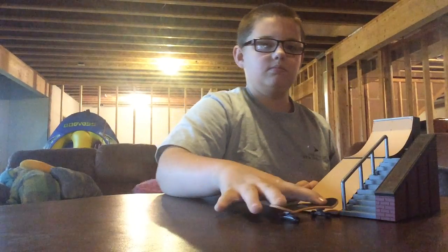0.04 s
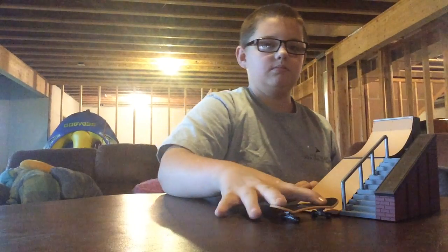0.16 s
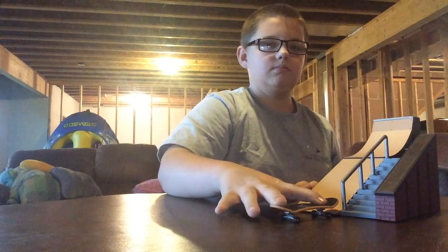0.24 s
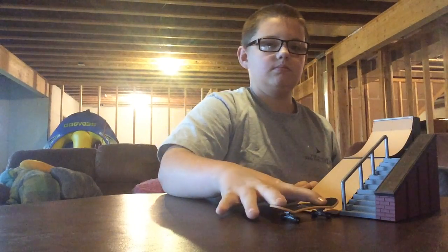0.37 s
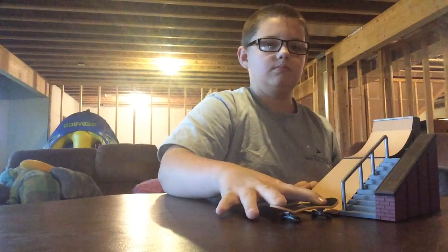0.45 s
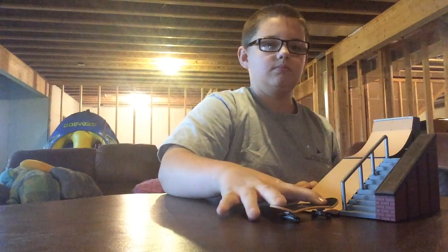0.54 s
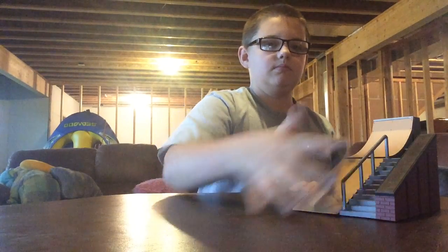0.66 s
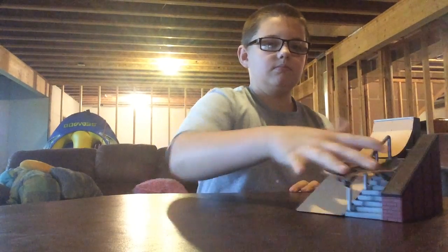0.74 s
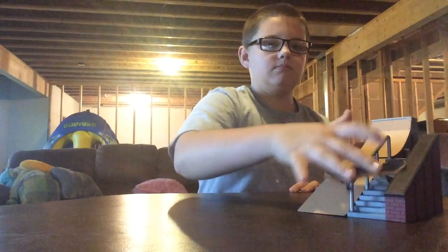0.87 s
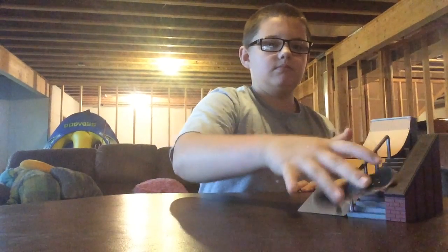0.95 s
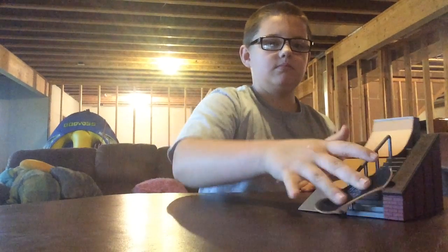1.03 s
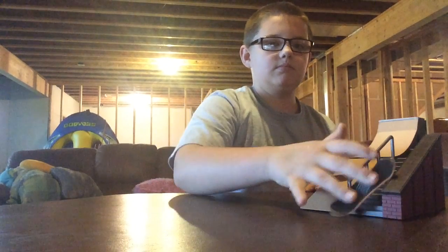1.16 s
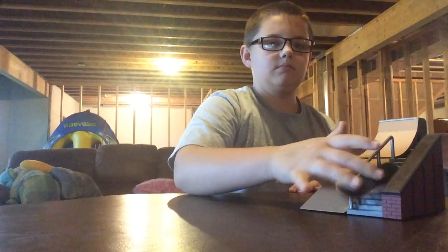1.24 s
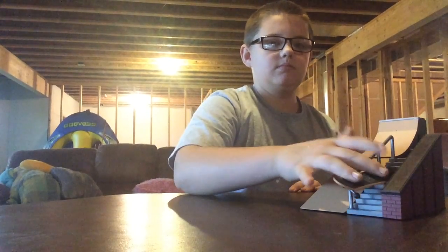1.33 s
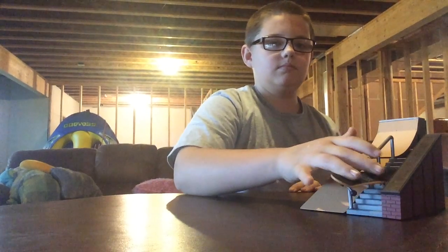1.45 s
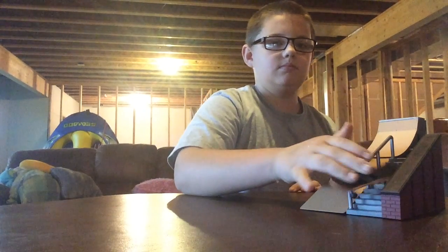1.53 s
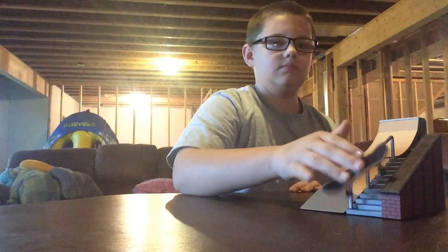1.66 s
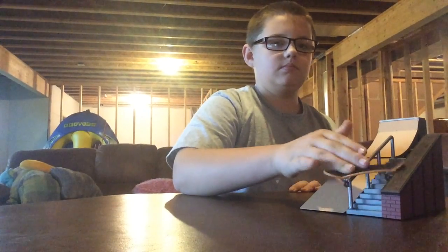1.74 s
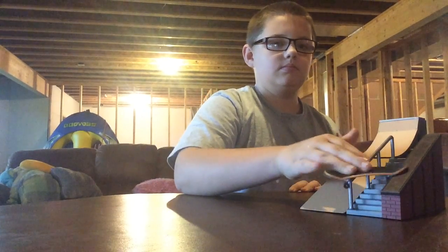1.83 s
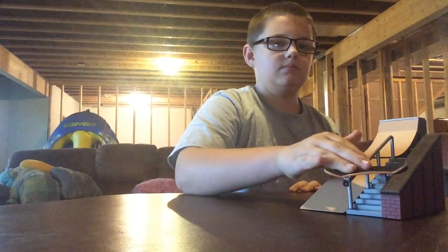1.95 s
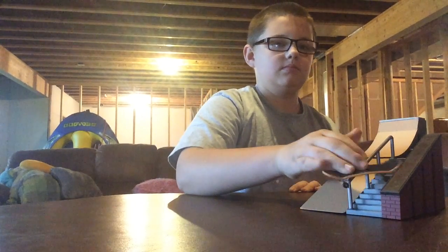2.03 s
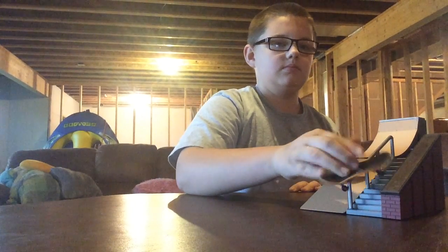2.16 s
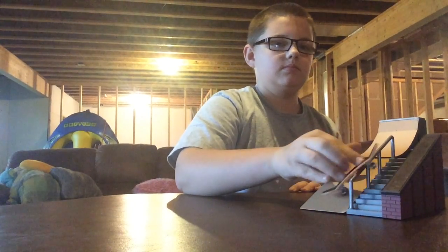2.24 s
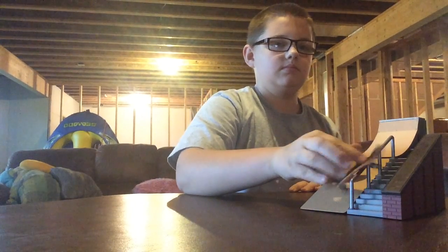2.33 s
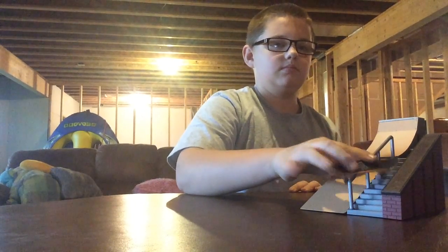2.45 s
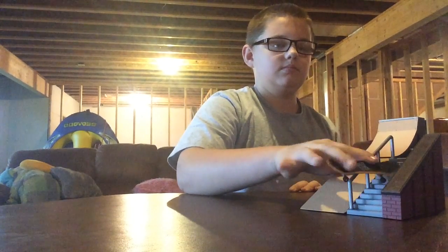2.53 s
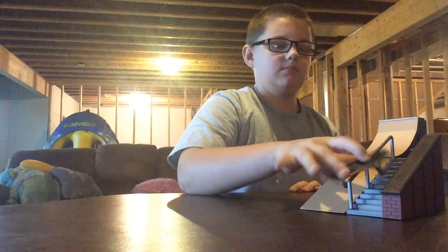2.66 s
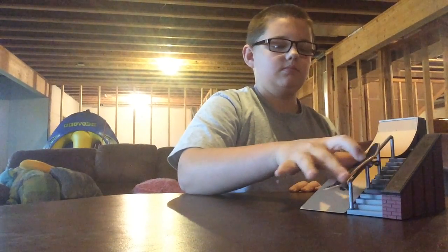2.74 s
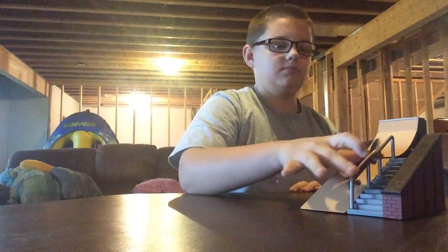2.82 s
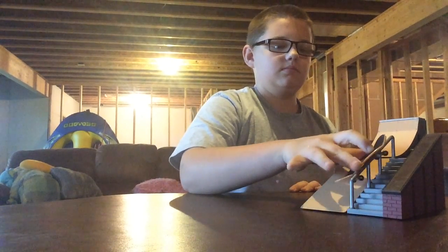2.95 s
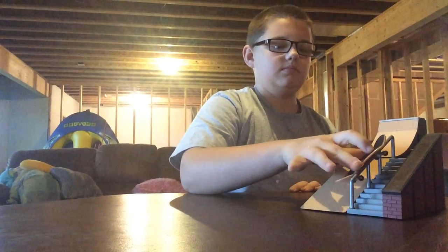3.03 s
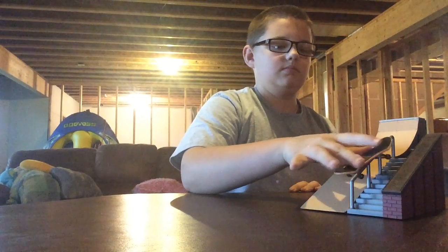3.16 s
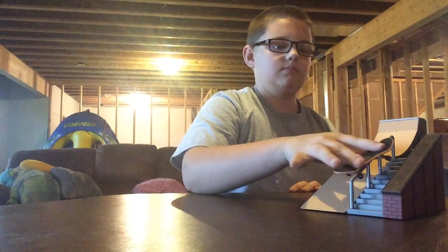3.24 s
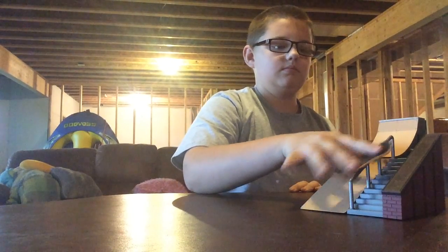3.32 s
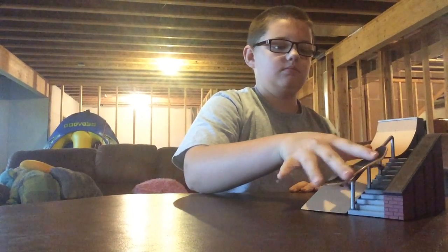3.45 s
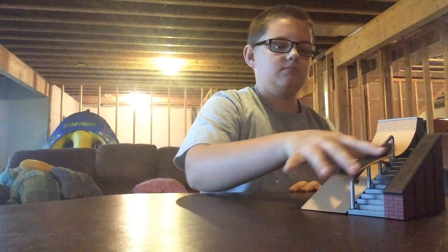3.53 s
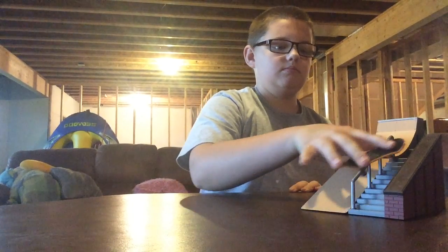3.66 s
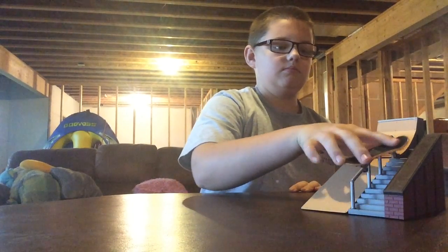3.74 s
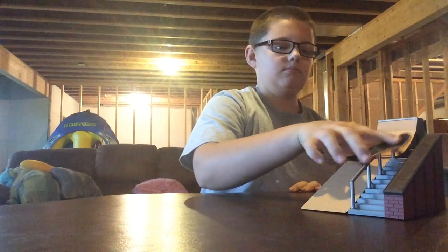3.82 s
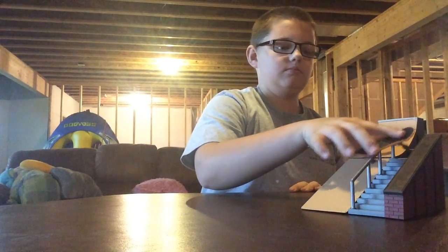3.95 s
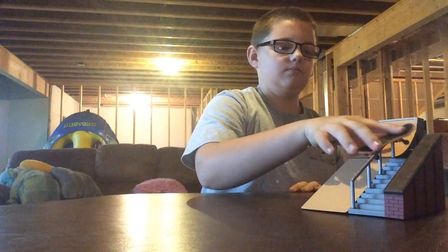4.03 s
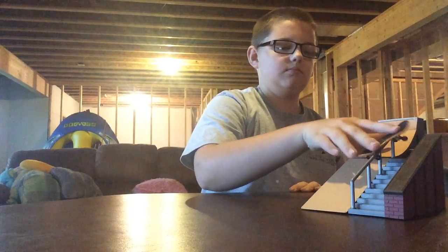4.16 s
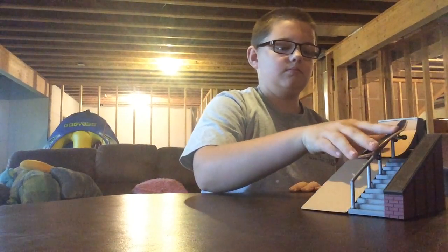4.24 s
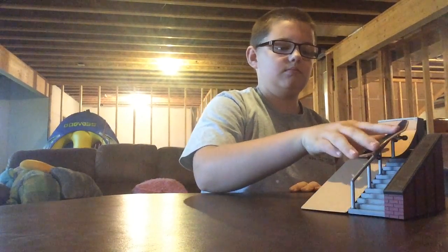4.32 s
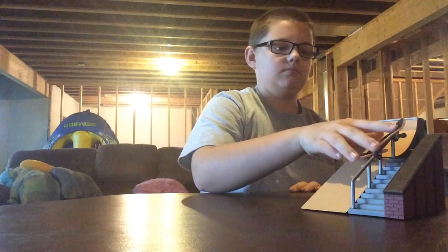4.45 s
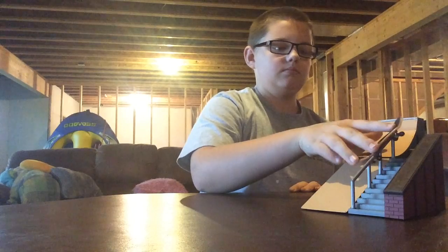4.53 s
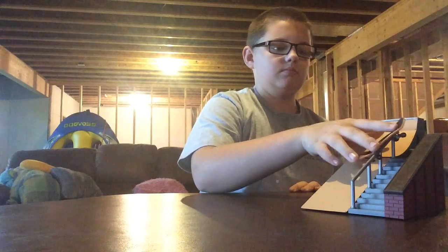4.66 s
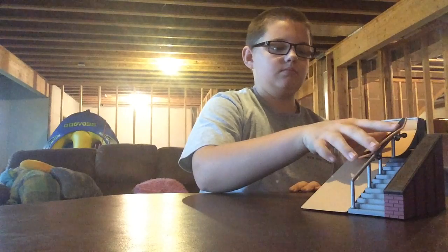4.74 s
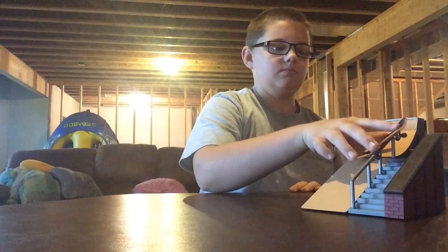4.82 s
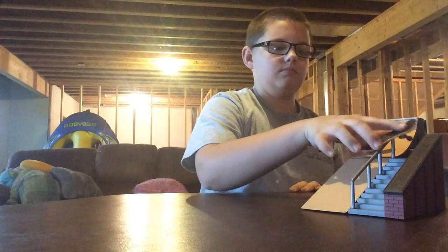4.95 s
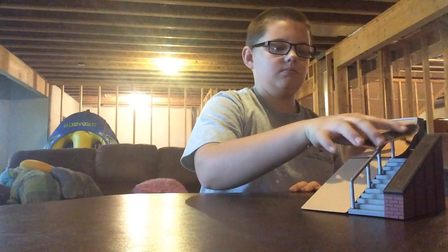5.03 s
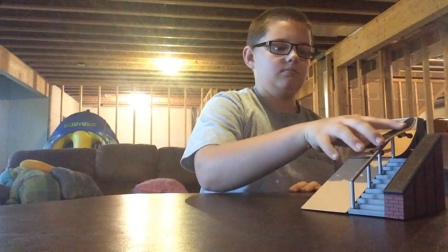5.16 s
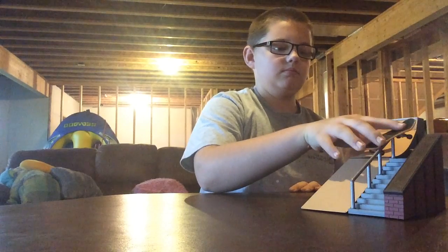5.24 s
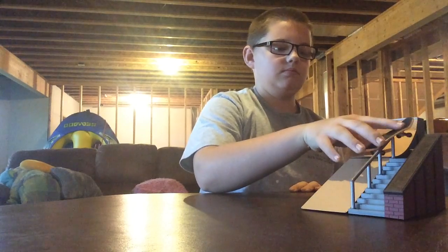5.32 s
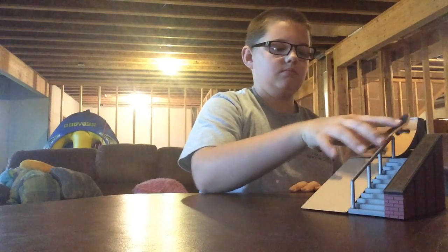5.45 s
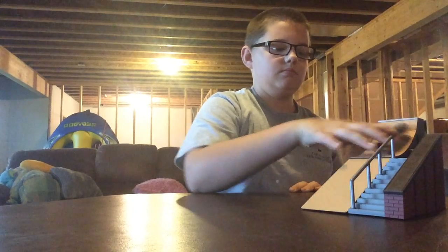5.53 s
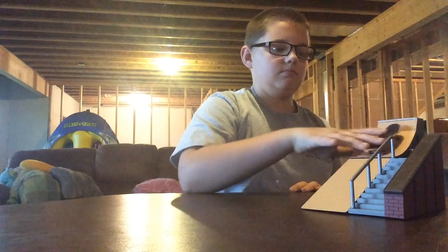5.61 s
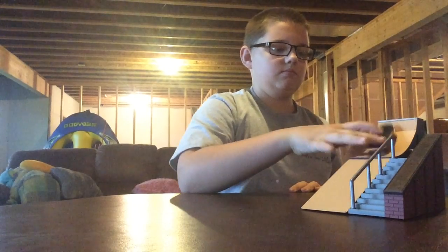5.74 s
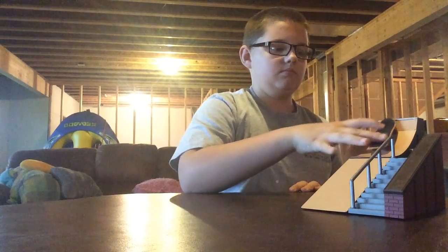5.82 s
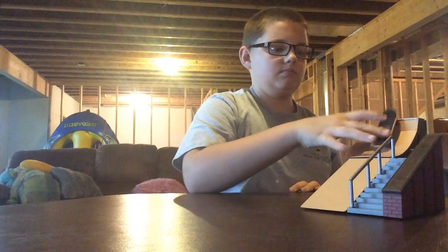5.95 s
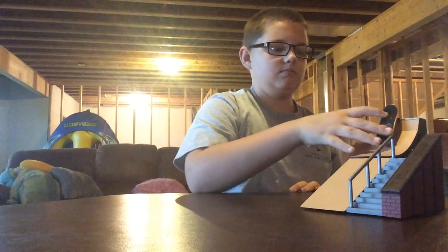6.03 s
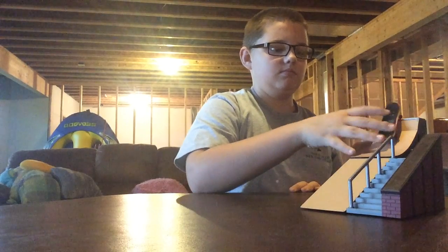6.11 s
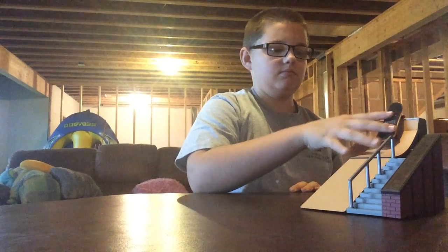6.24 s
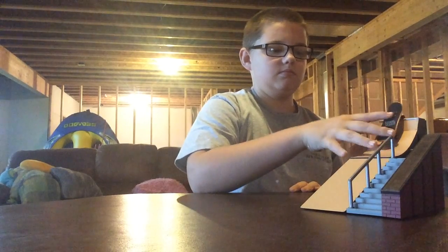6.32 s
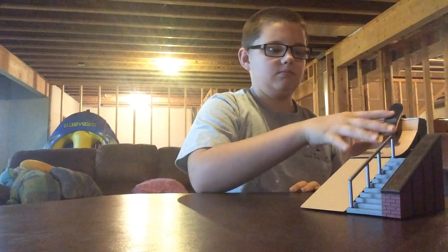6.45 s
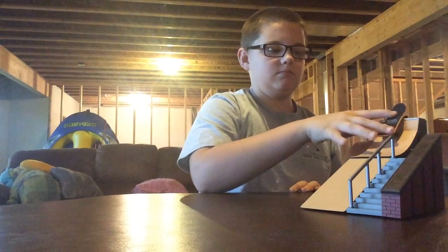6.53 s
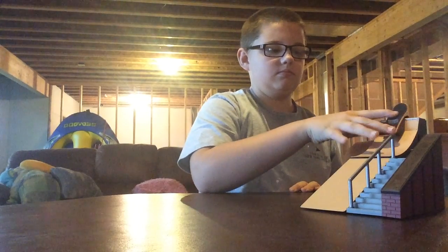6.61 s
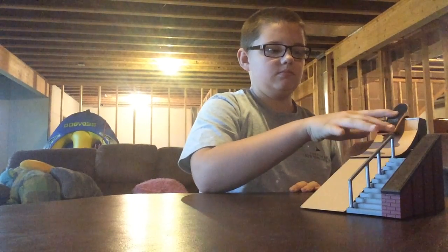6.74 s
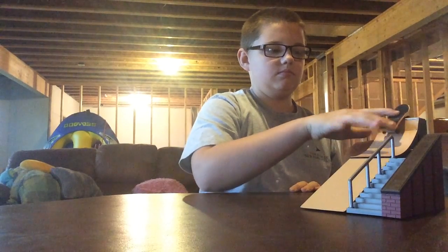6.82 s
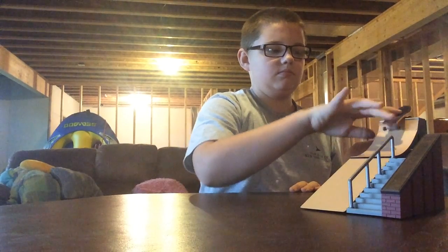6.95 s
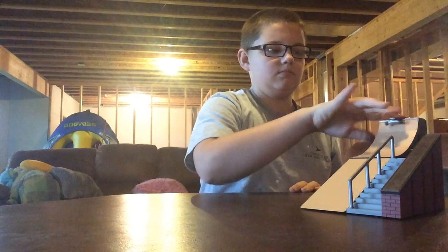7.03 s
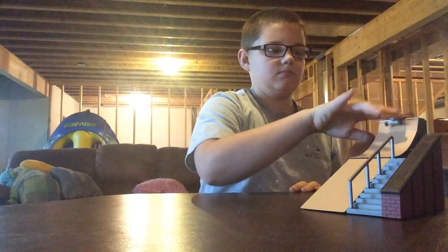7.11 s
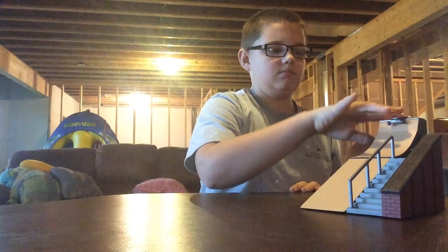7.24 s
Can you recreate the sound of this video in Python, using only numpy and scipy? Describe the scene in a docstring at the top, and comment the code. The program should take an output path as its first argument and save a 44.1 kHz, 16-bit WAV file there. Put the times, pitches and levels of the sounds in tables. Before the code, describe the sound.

Scattered clacks and brief scrapes of a tiny toy skateboard on a handrail and hollow plastic ramp, in a quietly humming basement.

```python
"""Over the low, steady hum of a house, a fingerboard is popped off a wooden table. It clacks and grinds
along a small handrail, and a few scattered clacks follow. At 5.6 s it lands on a hollow plastic ramp
and rocks there, its wheels rasping briefly; at 7.1 s it is let go and the deck rings freely.
All along, each knock rings the deck, its metal trucks, the ramp panel and the table top,
and the basement answers with a short tail."""
import sys
import numpy as np
from scipy import signal
from scipy.fft import rfft, irfft
from scipy.io import wavfile

SR = 44100
rng = np.random.default_rng(int(sys.argv[2]) if len(sys.argv) > 2 else 0)


def wrap_up_sound(samples):
    """Save the sound to the file named by the first command line argument, as 16-bit audio."""
    columns = np.atleast_2d(samples).T
    # keep every value between -1 and 1, then stretch to whole-number steps
    tamed = np.clip(columns, -1, 1)
    steps = np.round(tamed * 32767).astype(np.int16)
    wavfile.write(sys.argv[1], SR, steps)


N = 321036
KNOCK_T = np.arange(int(.5 * SR)) / SR   # time axis of one knock [s]
ATTACK = int(.012 * SR)   # the opening samples that set a knock's level


# the board's tail hits the table: (time [s], thump level [dB], thump centre [Hz])
POP_HITS = [(0.73, -20.5, 260), (1.104, -27, 186), (3.509, -35.5, 101)]

def pops(out):
    """A finger pops the tail down with a soft push: a round table thump under a small click."""
    for s, db, hz in POP_HITS:
        add(out, s, knock(db - 20, hardness_db=-2.1, table_db=db, panel_db=db - 15.5, chatter_s=0.0024,
                          table_hz=hz, table_lift_db=9.5, truck_db=5.5, rise_s=0.0033))


# hits on rail and steps: (time [s], level [dB], hardness [dB], hand's weight into the table [dB])
CLACK_HITS = [(0.782, -33, -1.5, -4), (0.807, -38.5, 7.5, -13), (0.827, -37, 3, -8),
              (0.868, -38.5, 2.5, 4.5), (1.002, -53, -7, 9), (1.016, -54, -0.5, 6), (1.19, -45.5, 4, -25),
              (1.246, -57.5, -4.5, 14.5), (1.281, -47, 1.5, 2), (1.362, -30, 1.2, -6.5),
              (1.461, -49, -7.5, -5), (1.54, -62, -7.5, 6), (1.671, -42, -2.5, -13), (1.685, -45.5, -8, -4),
              (1.785, -58.5, -1.5, 2), (1.821, -46, -2.5, 4.5), (1.896, -54.5, 5.5, 6),
              (1.947, -39.5, 1, -10), (2.103, -55.5, -1.5, 2), (2.195, -41.5, -2, -3.5),
              (2.22, -52, 4.5, -20), (2.314, -62, -2, 8), (2.389, -55.5, -2.5, 10),
              (2.499, -49.5, -2.5, -2), (2.526, -56, -4.5, 4), (2.589, -54.5, -3, 7),
              (2.799, -50, -2, -0.5), (2.916, -52, -8.5, -3), (3.039, -49, 3.5, 7), (3.391, -72, -19, 14),
              (3.493, -44.5, 3.5, 6), (3.735, -65, 1.5, -1), (3.831, -60, 1.5, 12), (4.122, -52, 1.5, 4.5),
              (4.807, -65, 2.5, -7), (5.026, -56, 4, 11.5), (5.097, -67, 10, 11.5)]
SOFT_CHATTER = 0.42   # dB of extra chatter time per dB of softness

def clacks(out):
    """The board clacks on rail and steps; softer contacts chatter longer."""
    for s, db, hardness_db, weight_db in CLACK_HITS:
        chatter_s = 0.0027 * from_db(-SOFT_CHATTER * hardness_db)
        add(out, s, knock(db, hardness_db, table_db=db + weight_db, panel_db=db + 1,
                          chatter_s=chatter_s, truck_db=-5, rail_db=-6))


# touchdowns on the ramp: (time [s], level [dB], hardness [dB], panel boom over level [dB], chatter [s])
LANDING_HITS = [(0.815, -27.5, -5, 4, 0.0012), (5.6, -33.5, -2, 11, 0.002), (5.609, -32.5, 0.5, -2, 0.0041),
                (5.622, -23, 1, -5, 0.0032), (5.628, -25.5, -2, 12.5, 0.0081),
                (7.105, -41, -5.5, 18, 0.012), (7.124, -36.5, -2, 17, .0085), (7.147, -28, -3.5, 3, 0.0033),
                (7.22, -28.5, -0.5, 9.5, 0.0045)]
LET_GO_S = 7.1   # from here on no finger touches the deck

def landings(out):
    """The hollow ramp booms; all four wheels load the deck, so it rings lower."""
    for s, db, hardness_db, boom_db, chatter_s in LANDING_HITS:
        add(out, s, knock(db, hardness_db, table_db=db - 3.5, panel_db=db + boom_db,
                          chatter_s=chatter_s, pitch_ratio=0.706, free=s > LET_GO_S))


# rocking on the ramp: (time [s], level [dB], hardness [dB], roll before [s], roll after [s])
BUMP_HITS = [(5.847, -47, -6.5, 0.035, 0.12), (5.974, -44.5, -0.5, 0.027, 0.035),
             (6.1, -46, -3, 0.061, 0.012), (6.231, -45.5, 3.5, .04, 0.037), (6.347, -47, -2, 0.0056, 0.031),
             (6.553, -54, 5, 0.062, 0.014), (6.64, -47.5, 4, 0.0087, 0.005)]

def bumps(out):
    """The wheels tick over the ramp's plastic joints, which ring higher than rail and steps."""
    for s, db, hardness_db, _, _ in BUMP_HITS:
        chatter_s = 0.0064 * from_db(-SOFT_CHATTER * hardness_db)
        add(out, s, knock(db, hardness_db, table_db=-47, panel_db=-33.5,
                          chatter_s=chatter_s, pitch_ratio=1.19))


# a harder contact rings brighter: (hardness [dB], favoured pitch [Hz])
HARDNESS_PITCH = [(-14, 980), (-6, 1150), (-2, 1820), (3.5, 2880), (3, 3300), (7.5, 4100)]
# modes of the deck with no finger on it: (pitch [Hz], level [dB], t60 [s])
FREE_DECK_MODES = [(845, -9, .08), (1240, -7, .06), (1958, 2, .085), (4220, -17, .1), (4600, -19, .1)]

def knock(db, hardness_db, table_db, panel_db, chatter_s, table_hz=389, table_lift_db=4.5, truck_db=-7,
          rise_s=0.00035, pitch_ratio=1, rail_db=None, free=False):
    """One hit: chatter sounds in the board, the push behind it rings ramp and table, the room answers."""
    deck_db, snap_db = db - hardness_db, db + hardness_db   # hardness tips wood towards fittings and trucks
    deck_hz = pitch_ratio * np.interp(hardness_db, *np.transpose(HARDNESS_PITCH))
    push = signal.unit_impulse(len(KNOCK_T))
    force = contact(chatter_s, chatter_db=14.5, rattle_s=0.005, rattle_db=8.5, rattles_per_s=1300)
    body = from_db(panel_db - 0.5) * ramp_panel(push)
    body += from_db(table_db) * table_top(push, table_hz, table_lift_db)
    if free:   # no finger damps the deck: more ring, less crack
        body += from_db(deck_db - 1.5) * rms_one(ring(push, FREE_DECK_MODES), ATTACK)
        deck_db -= 3.5
    levels = deck_db, snap_db, snap_db + truck_db
    direct = swell(rise_s) * board(favour(force, deck_hz, lift_db=9, q=7.7), *levels)
    if rail_db is not None:
        direct += from_db(snap_db + rail_db) * handrail(push)
    # over all directions the chatter's ripple evens out, so the room gets the plain touch
    room_send = board(favour(push, deck_hz, lift_db=4.5, q=2.2), *levels)
    return direct + body + basement(room_send + body)


def contact(chatter_s, chatter_db, rattle_s, rattle_db, rattles_per_s):
    """One hard touch, a quickly dying chatter, then a few tiny bounces of the loose wheels."""
    chatter, bounces = rng.standard_normal((2, len(KNOCK_T)))
    chatter *= swell(0.36 * chatter_s) * np.exp(-KNOCK_T / chatter_s)
    bounces *= (rng.random(len(KNOCK_T)) < rattles_per_s / SR) * np.exp(-KNOCK_T / rattle_s)
    return (signal.unit_impulse(len(KNOCK_T)) + from_db(chatter_db) * chatter / np.linalg.norm(chatter)
            + from_db(rattle_db) * bounces / np.linalg.norm(bounces))


# modes of the held board's three parts: (pitch [Hz], level [dB], t60 [s])
DECK_MODES = [(870, 0, .055), (1110, -4, .035), (1240, -1, .04), (1460, 0, .04), (1600, -2, .03),
              (1720, -3, .025), (1955, 1, .04), (2330, 1, .025)]
FITTING_MODES = [(2520, 0, .025), (2920, 1, .025), (3220, 1, .03), (3600, -2, .015), (3950, -1, .015),
                 (4280, 0, .02), (4830, -3, .012), (5950, -1, .02)]
TRUCK_MODES = [(8630, -1, .012), (9640, 0, .018), (10150, 0, .018), (11500, -1, .015), (12600, -3, .012)]

def board(force, deck_db, snap_db, truck_db):
    """Three layers: the wooden deck's knock, the plastic fittings' snap, the metal trucks' bright tick."""
    deck = from_db(deck_db) * gripped_part(force, DECK_MODES, 620, 2220, ring_db=0)
    snap = from_db(snap_db) * gripped_part(force, FITTING_MODES, 2460, 6530, ring_db=-1.5)
    trucks = from_db(truck_db) * gripped_part(force, TRUCK_MODES, 7600, 15700, ring_db=-12)
    return deck - snap + trucks


def gripped_part(force, modes, low_hz, high_hz, ring_db):
    """A small part under the fingers: a dry crack, and a short ring that the grip detunes."""
    detuned = [(hz * rng.normal(1, .01), db, t60) for hz, db, t60 in modes]
    crack = rms_one(band(force, low_hz, high_hz), ATTACK)
    ringing = rms_one(band(ring(force, detuned), low_hz, high_hz), ATTACK)
    return rms_one(crack + from_db(ring_db) * ringing, ATTACK)


# modes of the plastic ramp: (pitch [Hz], level [dB], t60 [s])
PANEL_MODES = [(401, -12, 0.032), (464.3, -5, 0.1), (517.7, 6, 0.054), (558.5, -0.5, 0.067),
               (636.5, -5.5, 0.084), (691.5, -9.5, 0.074)]

def ramp_panel(push):
    """The hollow ramp's panel answers a push with a boxy boom."""
    boom = swell(0.0023) * ring(push, PANEL_MODES)
    return rms_one(band(boom, 390, 870), ATTACK)


# modes of the wooden table's top and of its frame: (pitch [Hz], level [dB], t60 [s])
TOP_MODES = [(97, -9, 0.3), (124.7, -0.5, 0.098), (164.8, -1, 0.095), (209.9, -2, 0.09),
             (223.3, -12, 0.098), (260.8, 1.5, 0.062), (326.8, 7, 0.033)]
FRAME_MODES = [(42.6, 0, 0.81), (61.3, 0, 0.5)]

def table_top(push, centre_hz, lift_db):
    """The low end of a hit: the top thumps and the table shudders on its legs."""
    thump = swell(0.0036) * ring(favour(push, centre_hz, lift_db, q=2.1), TOP_MODES)
    shudder = swell(0.015) * ring(push, FRAME_MODES)
    return rms_one(band(thump, 37.2, 430), ATTACK) + from_db(-21.5) * rms_one(shudder, 4 * ATTACK)


# modes of the handrail: (pitch [Hz], level [dB], t60 [s])
RAIL_MODES = [(2880, -1.5, 0.023), (3236, -4, 0.13), (4425, 6.5, 0.026), (4890, 3, 0.017),
              (6100, 11.5, 0.024), (10600, -14, 0.13), (10930, 0, .06)]

def handrail(push):
    """The rail pings; where the board presses on it shifts its pitches and favours a few of them."""
    pressed = [(hz * rng.normal(1, .025), db, t60) for hz, db, t60 in RAIL_MODES]
    return rms_one(ring(push, pressed, scatter_db=5), ATTACK)


# strokes along the rail: (peak time [s], rise [s], fall [s], level [dB])
GRIND_STROKES = [(1.04, 0.042, 0.029, -47), (1.098, 0.0083, 0.019, -42.5), (1.29, 0.072, .05, -50.5),
                 (1.355, 0.038, 0.0093, -35.5), (1.673, 0.028, 0.031, -47.5), (1.78, 0.081, .07, -64),
                 (1.94, 0.075, .02, -57), (2.2, 0.11, 0.051, -65), (2.5, 0.11, 0.3, -62.5),
                 (2.82, 0.1, 0.13, -63)]

def grinds(rasp, drone, clinks_per_s=30):
    """The loose trucks scrape along the rail; each of their and the fittings' modes clinks at random."""
    clinks = rms_one(sum(ring(ticks(clinks_per_s), [mode]) for mode in FITTING_MODES + TRUCK_MODES))
    return strokes(GRIND_STROKES) * (rasp + from_db(-3.5) * drone + from_db(-5.5) * clinks)


def rolls(rasp, drone, run_out_s=0.27):
    """The wheels run out after each landing, and roll up to each bump and on past it."""
    run_outs = [(s, .01, run_out_s, db - 32) for s, db, *_ in LANDING_HITS]
    rocking = [(s, before_s, after_s, db - 2) for s, db, _, before_s, after_s in BUMP_HITS]
    return strokes(run_outs + rocking) * (rasp + from_db(13) * drone)


def wheel_grit(grains_per_s, spread_db):
    """Grit under the wheels makes two textures: a rasp in the deck and a drone in the hollow ramp."""
    grains = ticks(grains_per_s) * from_db(spread_db * rng.standard_normal(N))
    grit = favour(grains, 1500, lift_db=12, q=7.1)
    grit = favour(grit, 3240, lift_db=8, q=9)
    rasp = rms_one(band(grit, 530, 6000)) + from_db(-19) * rms_one(band(grit, 5900, 11000))
    drone = band(ring(np.sign(grains), PANEL_MODES), 381, 657)
    return rms_one(rasp), rms_one(drone)


def strokes(rows, speed_power=1.38):
    """Envelope of strokes that speed up and slow down evenly; gain follows a power of the speed."""
    t = np.arange(N) / SR
    return np.max([from_db(db) * np.interp(t, [s - rise, s, s + fall], [0, 1, 0]) ** speed_power
                   for s, rise, fall, db in rows], axis=0)


# the basement's reverb: (frequency [Hz], wet against dry [dB], t60 [s])
REVERB_BANDS = [(64.3, -9.5, 0.35), (200, -6.5, 0.37), (526.5, -7, 0.35), (1223, -15.5, 0.47),
                (2970, -11, 0.27), (5860, -7, 0.34), (10000, -7, 0.19), (14740, -2, 0.19)]

def basement(x, first_s=0.0079, early_s=0.017, early_db=4):
    """A dense early cluster off joists and studs, then a short tail, octave by octave."""
    edges_hz = 40 * 2 ** np.arange(10)
    onset = np.clip(KNOCK_T / first_s - .5, 0, 1)
    early_lift = 1 + from_db(early_db) * np.exp(-KNOCK_T / early_s)
    response = 0
    for low, high in zip(edges_hz, edges_hz[1:]):
        wet_db, t60 = at_hz(REVERB_BANDS, np.sqrt(low * high))
        fade = onset * early_lift * from_db(-60 * KNOCK_T / t60)
        echoes = band(rng.standard_normal(len(fade)), low, high)
        response += from_db(wet_db) * echoes * fade / np.linalg.norm(fade)
    return signal.fftconvolve(x, response)[:len(x)]


# spectrum of the room tone: (frequency [Hz], relative level [dB])
ROOM_TONE = [(15, -40.5), (25, -12.5), (119, -9), (144, -14), (178, -6), (246, -9), (267, -13.5),
             (349, -7.5), (389, -11.5), (469, -9.5), (567, -15.5), (631, -14.5), (2120, -27.5),
             (2490, -28.5), (15500, -40.5)]

def house_hum(rms_db=-59.5):
    """Steady low noise of the house with a faint hiss."""
    shape_db, = at_hz(ROOM_TONE, np.maximum(np.fft.rfftfreq(N, 1 / SR), 1))
    noise = irfft(rfft(rng.standard_normal(N)) * from_db(shape_db), N)
    return from_db(rms_db) * rms_one(band(noise, 21, SR / 2))


# tones of a motor in the house: (pitch [Hz], rms level [dB])
MOTOR_TONES = [(118.4, -68.5), (177.6, -67.5), (236.9, -68.5), (355.3, -72), (1830, -82), (2185, -80.5)]

def motor():
    """A distant motor hums on multiples of its speed and whines faintly."""
    t = np.arange(N) / SR
    return sum(np.sqrt(2) * from_db(db) * np.sin(2 * np.pi * (hz * t + rng.random()))
               for hz, db in MOTOR_TONES)


def ring(force, modes, scatter_db=2):
    """Drive a body's modes; where the force lands gives each mode a strength of its own."""
    out = 0
    for hz, db, t60 in modes:
        decay, angle = from_db(-60 / (t60 * SR)), 2 * np.pi * hz / SR
        gain = from_db(db + scatter_db * rng.standard_normal())
        feedback = [1, -2 * decay * np.cos(angle), decay * decay]
        out += gain * signal.lfilter([np.sin(angle)], feedback, force + 1e-18)
    return out


def favour(force, centre_hz, lift_db, q):
    """The point of contact lifts a region around one pitch."""
    return force + (from_db(lift_db) - 1) * signal.lfilter(*signal.iirpeak(centre_hz, q, fs=SR), force)


def swell(rise_s):
    """Attack envelope: motion needs a moment to spread through a body."""
    return 1 - np.exp(-KNOCK_T / rise_s)


def ticks(per_s):
    """Impulses of random timing and size."""
    return (rng.random(N) < per_s / SR) * rng.standard_normal(N)


def band(x, low_hz, high_hz):
    """Second-order band-pass."""
    edges_hz = [low_hz, min(high_hz, SR / 2 - 100)]
    return signal.sosfilt(signal.butter(2, edges_hz, "band", fs=SR, output="sos"), x)


def at_hz(rows, hz):
    """Read each column of a table on a log-frequency axis."""
    points, *columns = np.transpose(rows)
    return [np.interp(np.log(hz), np.log(points), c) for c in columns]


def from_db(db):
    """Decibels to gain."""
    return 10 ** (np.asarray(db) / 20)


def rms_one(x, size=None):
    """Scale so that the first `size` samples (or all) have rms 1."""
    return x / np.sqrt(np.mean(x[:size] ** 2) + 1e-20)


def add(out, s, sound):
    """Mix a sound in from its moment on."""
    start = round(s * SR)
    out[start:start + len(sound)] += sound[:N - start]


def scene():
    """The mono mix: hits in front, the wheels under them, the house behind."""
    rasp, drone = wheel_grit(grains_per_s=3000, spread_db=2.5)
    wheels = grinds(rasp, drone) + rolls(rasp, drone)
    hits = np.zeros(N)
    for play in (pops, landings, bumps, clacks):
        play(hits)
    return (hits + wheels + basement(wheels) + house_hum() + motor())[None]


def record(dry, cutoff_hz=15300):
    """The microphone rounds the hardest peaks, loses the deep bass, softens and then cuts the top."""
    rounded = .9 * np.tanh(dry / .9)
    soft = signal.sosfilt(signal.butter(4, [30, 14200], "band", fs=SR, output="sos"), rounded)
    return signal.sosfilt(signal.ellip(8, .2, 70, cutoff_hz, fs=SR, output="sos"), soft)


dry = scene()
out = record(dry)
wrap_up_sound(out)
```